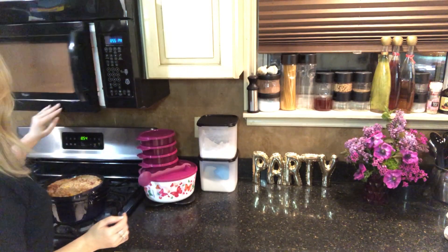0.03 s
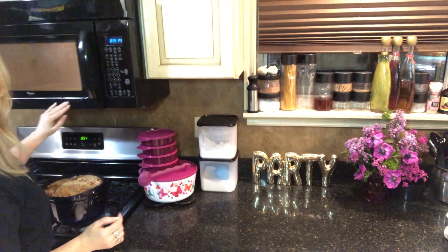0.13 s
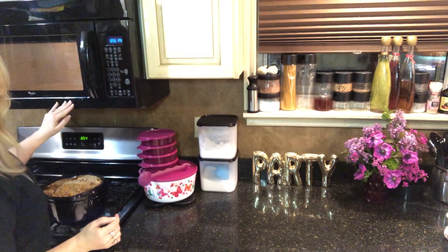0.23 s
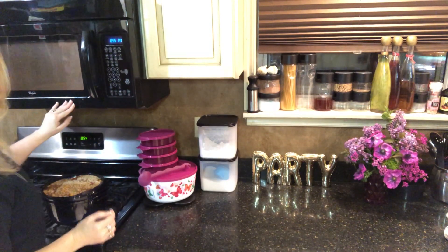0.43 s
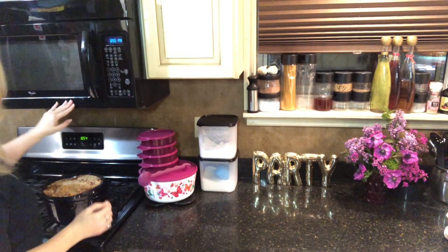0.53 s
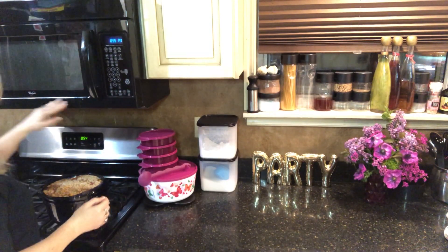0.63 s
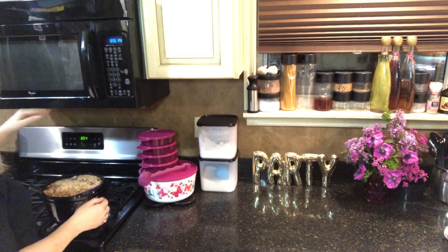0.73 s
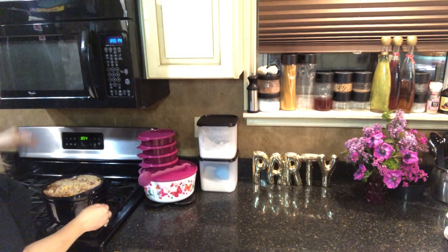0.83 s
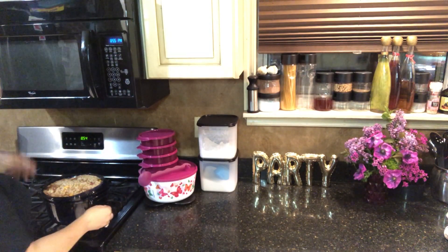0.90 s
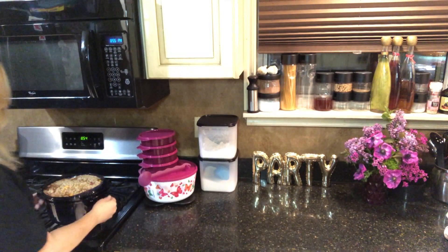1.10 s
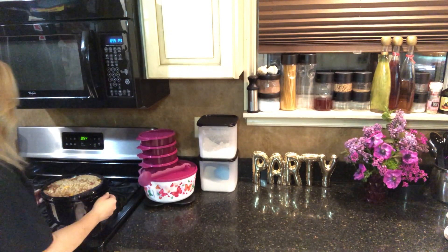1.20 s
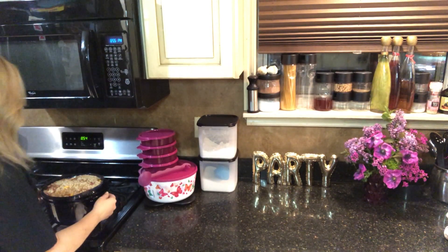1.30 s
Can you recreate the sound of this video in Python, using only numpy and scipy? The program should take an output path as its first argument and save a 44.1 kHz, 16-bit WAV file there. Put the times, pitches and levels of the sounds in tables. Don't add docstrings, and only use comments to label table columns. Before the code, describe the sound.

A microwave door closes: plastic hooks rattle and knock sharply, then a fuller, louder slam follows a fifth of a second later with a short hollow boom. Quiet home kitchen, faint hum and hiss, mono microphone nearby.

```python
import sys
import numpy as np
from scipy import signal
from scipy.fft import rfft, irfft
from scipy.io import wavfile
from scipy.ndimage import map_coordinates

SR = 44100
rng = np.random.default_rng(int(sys.argv[2]) if len(sys.argv) > 2 else 0)


def persist_wave(psi):
    counts = np.round(np.clip(psi, -1, 1) * 32767).astype(np.int16)
    wavfile.write(sys.argv[1], SR, np.atleast_2d(counts).T)


def ratio_of_db(decibels):
    return 10 ** (np.asarray(decibels, float) / 20)


N = 59535

# start_s, level_db, rattle_t60_s
SLAM_HITS = [
    (.4125, -28, 0.058),
    (.4160, -28.5, 0.032),
    (.4242, -23, 0.031),
    (.4295, -29.5, 0.055),
    (.435, -29, 0.044),
    (.440, -28, 0.041),
    (.445, -39, 0.072),
    (.457, -37, 0.063),
]
# frequency_hz, density_db_per_hz
SLAM_COLOUR = [(350, -17), (550, -1), (850, 2), (1300, 1), (2900, -4.5), (3500, -12), (7000, -18),
               (16000, -33.5)]
# frequency_hz, level_db, t60_s
SLAM_MODES = [(823, 7, 0.06), (916, -4, 0.046), (1340, -23, 0.071), (1390, -16, 0.14), (1920, -7, 0.042),
              (2146, -8, 0.071), (2900, -30, 0.013), (6800, -13, 0.013)]
# start_s, level_db, rattle_t60_s
KNOCK_HITS = [
    (.2612, -18.5, 0.0048),
    (.2640, -25, 0.037),
    (.273, -29, 0.045),
    (.279, -32, 0.03),
    (.287, -31.5, 0.04),
]
# frequency_hz, density_db_per_hz
KNOCK_COLOUR = [(250, -14), (450, -4), (850, -1), (1400, -5.5), (2100, -13.5), (5500, -24.5), (10000, -40),
                (14000, -36)]
# frequency_hz, level_db, t60_s
KNOCK_MODES = [(391, 3, 0.1), (504, 2, 0.16), (652, 7, 0.092), (853, -8, 0.042), (950, 1.5, 0.092),
               (1189, -9, 0.14), (1400, 5.5, 0.079), (1853, 3, 0.057), (2320, -14, 0.064)]
# start_s, level_db, rattle_t60_s
HOOK_HITS = [
    (.2028, -39, 0.068),
    (.2055, -35, 0.14),
    (.2125, -29.5, 0.046),
    (.2165, -31, 0.032),
    (.226, -32.5, 0.14),
    (.234, -33, 0.04),
]
# frequency_hz, density_db_per_hz
HOOK_COLOUR = [(300, -26), (600, -7), (1100, -1.5), (1900, -6.5), (2400, -5), (3500, -9), (6200, -14),
               (16000, -41)]
# frequency_hz, level_db, t60_s
HOOK_MODES = [(275, -10.5, 0.047), (473, -2.5, 0.32), (848.6, -0.5, 0.18), (1400, -21, 0.033),
              (1845, -0.5, 0.16), (2470, -25, 0.017), (2390, -8, 0.03), (3120, -19, 0.025)]
# start_s, level_db, rattle_t60_s
SPRING_HITS = [
    (.3885, -45, 0.073),
    (.397, -51, 0.38),
]
# frequency_hz, density_db_per_hz
SPRING_COLOUR = [(300, -48), (1500, 10), (4000, 6), (8000, -2), (11000, -12), (14500, -1), (16000, -8)]
# frequency_hz, level_db, t60_s
SPRING_MODES = [(3300, -21, 0.024), (4040, -1, 0.016), (14130, -2, .008), (15400, 2, .008)]
# start_s, level_db, rattle_t60_s
PANEL_HITS = [
    (.207, -41, 0.22),
    (.235, -57, 0.05),
    (.262, -39, 0.02),
    (.370, -48, 0.63),
    (.404, -44, 0.12),
    (.426, -23.5, 0.024),
    (.440, -29.5, 0.094),
    (.464, -52, 0.15),
]
# frequency_hz, density_db_per_hz
PANEL_COLOUR = [(90, -11.5), (130, 3), (200, 0.5), (320, -6.5), (480, -2.5), (700, -0.5), (1200, -13),
                (3000, -65)]
# frequency_hz, level_db, t60_s
PANEL_MODES = [(130, -6, 0.24), (197, -16, 0.11), (246.8, -4, 0.25), (321, -9, 0.079), (390, 0.5, 0.03),
               (484, -2.5, 0.065), (518, -15, 0.5), (573, -8, 0.14)]
# start_s, level_db, rattle_t60_s
CRACK_HITS = [
    (.2027, -45, 0.022),
    (.2052, -42, 0.018),
    (.2120, -47, 0.0086),
    (.2610, -43, .03),
    (.3885, -53, 0.0087),
    (.4124, -32.5, 0.015),
    (.4236, -34, 0.025),
    (.4330, -31.5, .01),
]
# frequency_hz, density_db_per_hz
CRACK_COLOUR = [(2000, -25), (4000, 1), (6700, 2.5), (9000, -15), (12000, -7), (14500, -9), (16200, -6)]
# frequency_hz, level_db, t60_s
CRACK_MODES = [(5070, 2, 0.027), (6500, -5.5, 0.0063), (13700, -7, .02)]
# start_s, level_db, pitch_hz
BLOWS = [(0.2093, -37, 1100), (0.2207, -29.5, 990), (.2385, -31.5, 700), (0.2637, -23, 980),
         (0.2664, -28.5, 1400), (0.2717, -31, 1310), (0.4135, -25.5, 940), (.4160, -23, 1540),
         (0.4239, -23, 1720), (.4285, -23.5, 800), (0.4446, -27.5, 450), (.4640, -27.5, 330)]
# start_s, level_db
SNAPS = [
    (0.2037, -31),
    (0.206, -27.5),
    (0.217, -31.5),
    (0.4131, -32),
    (.4240, -23),
    (0.426, -33.5),
]
# frequency_hz, level_db, t60_s
SNAP_MODES = [(1853, -5, 0.019), (2347, -3, 0.019), (2566, -4, 0.031), (3050, -4, 0.016)]
# frequency_hz, level_db, t60_s
THUD_MODES = [(184, -17.5, 0.091), (206, -15, 0.077), (240, -5, 0.1), (299.6, -6, 0.092),
              (355, -6.5, 0.089), (484.8, 0, 0.1), (507, -36, 0.23), (558.6, -22, 0.21)]
# start_s, length_s, level_db
FLEXES = [
    (.365, 0.064, -51),
    (.426, 0.047, -35.5),
]
# frequency_hz, level_db, t60_s
CAVITY_MODES = [(182.5, -6, 0.75), (242.6, -4.5, 0.83), (290, -7, .6), (310.4, 2.5, .4), (431, -9, 0.47),
                (515, -4, 0.73), (557, -0.5, 0.49), (820, -7.5, 0.61)]
# start_s, length_s, level_db
SHOVES = [
    (.21, 0.1, -63),
    (.365, 0.066, -67),
    (.43, 0.1, -48),
    (.59, 0.068, -60),
    (.76, 0.052, -78),
]
# start_s, level_db, rattle_t60_s
TICK_HITS = [
    (.530, -48.5, 0.017),
    (1.1509, -58.5, 0.0067),
    (1.2615, -66, 0.013),
]
# frequency_hz, density_db_per_hz
TICK_COLOUR = [(1500, -2), (3000, -6), (6000, -10), (10000, -7.5), (13000, -7), (16000, -24)]
# start_s, level_db, rattle_t60_s
SCRAPE_HITS = [
    (1.3358, -56.5, 0.14),
    (1.341, -51.5, 0.12),
]
# frequency_hz, density_db_per_hz
SCRAPE_COLOUR = [(350, -72), (600, -14), (2010, 1.5), (2400, -5.5), (2830, -2), (6120, -7), (16000, -16)]
# frequency_hz, t60_s
KITCHEN = [(60, 1), (200, 0.43), (500, 0.37), (1500, 0.37), (5000, 0.34), (14000, 0.3)]
# start_s, length_s, level_db
BUZZES = [
    (.0, 0.048, -72),
    (0.063, 0.18, -71),
    (1.144, 0.13, -68.5),
    (1.266, 0.051, -67),
]
# frequency_hz, width_hz, level_db
FRIDGE = [(135.2, 11, -76), (257, 28, -72), (768, 11.3, -80.5), (1210, 13, -90), (1980, 39, -114)]
# time_s, level_db
HISS = [(0, -83), (.7, -82.5), (1.0, -79), (1.15, -77.5), (1.35, -84.5)]
# frequency_hz, density_db_per_hz
HISS_COLOUR = [(800, -19), (2000, 2.5), (4500, 8.5), (7500, 2.5), (9000, -13), (16000, -23)]
# frequency_hz, density_db_per_hz
AIR = [(45, -12), (60, -8), (88, -18.5), (123, -10), (258, -6), (399, -10), (1500, -22), (16000, -35.5)]


def unit(x):
    return x / np.sqrt(np.mean(x ** 2) + 1e-20)


def along(points, hz):
    f, v = np.transpose(points)
    return np.interp(np.log(hz + 1), np.log(f + 1), v)


def coloured(x, points):
    size = 2 ** 13
    low_end = (points[0][0] / 3, points[0][1] - 60)
    level_db = along([low_end] + list(points), np.fft.rfftfreq(size, 1 / SR))
    cepstrum = irfft(np.log(ratio_of_db(level_db) + 1e-6), size)
    cepstrum[1:size // 2] *= 2
    cepstrum[size // 2 + 1:] = 0
    response = irfft(np.exp(rfft(cepstrum)), size)
    return signal.fftconvolve(x, response / np.linalg.norm(response))[:len(x)]


def wobble(rate_hz):
    knots = rng.standard_normal(int(N * rate_hz / SR) + 4)
    return map_coordinates(knots, [np.arange(N) * rate_hz / SR])


def kitchen(x, wet_db=-4):
    hz, t, z = signal.stft(rng.standard_normal(SR), SR, nperseg=256)
    decay = ratio_of_db(-60 * t / along(KITCHEN, hz)[:, None])
    tail = signal.istft(z * decay, SR, nperseg=256)[1]
    tail = tail * (1 - np.exp(-np.arange(len(tail)) / SR / 0.0036))
    return x + ratio_of_db(wet_db) * signal.fftconvolve(x, tail / np.linalg.norm(tail))[:N]


def contacts(hits, colour, modes, ring_db, rise_s, grit_db):
    rattle, t = np.zeros(N + SR), np.arange(SR // 2) / SR
    for start_s, db, t60 in hits:
        grain_db = grit_db * np.repeat(rng.standard_normal(len(t) // 30), 30)
        grit = rng.standard_normal(len(t)) * ratio_of_db(grain_db)
        envelope = ratio_of_db(db - 60 * t / t60) * (1 - np.exp(-t / rise_s))
        rattle[round(start_s * SR):][:len(t)] += envelope * unit(grit)
    ring = sum(ratio_of_db(db - 60 * t / t60) * np.sin(2 * np.pi * hz * t) / np.sqrt(t60) for hz, db, t60 in modes)
    rung = signal.fftconvolve(rattle, ring / np.linalg.norm(ring))[:N]
    return kitchen(coloured(rattle[:N], colour) + ratio_of_db(ring_db) * rung)


def swells(rows, hz, steady=0):
    t = np.arange(N) / SR
    size = steady
    for start_s, length_s, db in rows:
        size = size + ratio_of_db(db) * np.sin(np.pi * np.clip((t - start_s) / length_s, 0, 1))
    return 2 * size * np.sin(2 * np.pi * np.cumsum(hz) / SR)


def slam():
    return contacts(SLAM_HITS, SLAM_COLOUR, SLAM_MODES, ring_db=-10.5, rise_s=0.00064, grit_db=2.5)


def ramp_knock():
    return contacts(KNOCK_HITS, KNOCK_COLOUR, KNOCK_MODES, ring_db=-3.5, rise_s=0.00018, grit_db=-4.0)


def hooks():
    return contacts(HOOK_HITS, HOOK_COLOUR, HOOK_MODES, ring_db=-2.5, rise_s=0.00055, grit_db=-1.0)


def spring():
    return contacts(SPRING_HITS, SPRING_COLOUR, SPRING_MODES, ring_db=-9.0, rise_s=0.00038, grit_db=1.5)


def panel():
    return contacts(PANEL_HITS, PANEL_COLOUR, PANEL_MODES, ring_db=2.0, rise_s=0.0045, grit_db=1.0)


def cracks():
    return contacts(CRACK_HITS, CRACK_COLOUR, CRACK_MODES, ring_db=-5.5, rise_s=0.00041, grit_db=1.0)


def blows():
    t, push = np.arange(N) / SR, np.zeros(N)
    for start_s, db, hz in BLOWS:
        cycles = np.clip(t - start_s, 0, None) * hz
        push -= ratio_of_db(db + 7 - 60 * cycles / 4.35) * np.sin(2 * np.pi * cycles)
    return kitchen(push, wet_db=-5)


def snaps():
    out, t = np.zeros(N + SR), np.arange(SR // 10) / SR
    rise = 1 - np.exp(-t / 0.0015)
    for start_s, db in SNAPS:
        ring = np.zeros(len(t))
        for hz, level, t60 in SNAP_MODES:
            luck_db = 3.0 * rng.standard_normal()
            ring += ratio_of_db(level + luck_db - 60 * t / t60) * np.sin(2 * np.pi * hz * t)
        out[round(start_s * SR):][:len(t)] += ratio_of_db(db + 2.5) * rise * ring
    return kitchen(out[:N])


def thud():
    u = np.clip(np.arange(N) / SR - 0.4265, 0, None)
    ring = sum(ratio_of_db(db - 60 * u / t60) * np.sin(2 * np.pi * hz * u) for hz, db, t60 in THUD_MODES)
    return kitchen(ratio_of_db(-19) * (1 - np.exp(-u / 0.0048)) * ring, wet_db=-9.5)


def flex():
    return swells(FLEXES, np.full(N, 193.1))


def cavity():
    u = np.clip(np.arange(N) / SR - 0.43, 0, None)
    ring = np.zeros(N)
    for hz, db, t60 in CAVITY_MODES:
        ring += ratio_of_db(db - 60 * u / t60 + 4.5 * wobble(24.96)) * np.sin(2 * np.pi * hz * u)
    return ratio_of_db(-41) * (1 - np.exp(-u / 0.041)) * ring


def cabinet():
    return swells(SHOVES, 58.23 + 1.32 * wobble(17), steady=ratio_of_db(-74 + 0.92 * wobble(12.0)))


def ticks():
    t, shape = np.arange(N) / SR, np.zeros(N)
    for start_s, db, t60 in TICK_HITS:
        shape += ratio_of_db(db - 60 * np.clip(t - start_s, 0, None) / t60) * (t >= start_s)
    return coloured(shape * rng.standard_normal(N), TICK_COLOUR)


def scrape():
    modes = [(1945, -6, 0.029), (2770, -10, 0.02)]  # frequency_hz, level_db, t60_s
    return contacts(SCRAPE_HITS, SCRAPE_COLOUR, modes, ring_db=-5, rise_s=0.001, grit_db=4.5)


def fridge_buzz():
    return swells(BUZZES, 259.5 + 4.38 * wobble(20))


def fridge_hum():
    f, hum = np.fft.rfftfreq(N, 1 / SR), np.zeros(N)
    for hz, width_hz, db in FRIDGE:
        band = np.exp(-((f - hz) / width_hz) ** 2)
        hum += ratio_of_db(db) * unit(irfft(rfft(rng.standard_normal(N)) * band, N))
    return hum


def pan_hiss():
    time_s, db = np.transpose(HISS)
    level_db = np.interp(np.arange(N) / SR, time_s, db) + 1.5 + 2.1 * wobble(28.34)
    return ratio_of_db(level_db) * unit(coloured(rng.standard_normal(N), HISS_COLOUR))


def room_air():
    return ratio_of_db(-67 + wobble(13.4) / 2) * unit(coloured(rng.standard_normal(N), AIR))


def scene():
    latch = ramp_knock() + hooks() + spring() + cracks() + snaps()
    door = slam() + panel() + blows() + thud() + flex()
    body = cavity() + cabinet() + ticks()
    background = scrape() + fridge_buzz() + fridge_hum() + pan_hiss() + room_air()
    return (latch + door + body + background)[None]


def top_cut(x):
    return signal.sosfilt(signal.butter(12, 16470, fs=SR, output="sos"), x)


def record(dry):
    low_pass = signal.cheby2(12, 50, 16500, fs=SR, output="sos")
    high_pass = signal.butter(4, 50.6, "high", fs=SR, output="sos")
    mix = signal.sosfilt(high_pass, signal.sosfilt(low_pass, dry))
    return top_cut(mix)


dry = scene()
out = record(dry)
persist_wave(out)
```